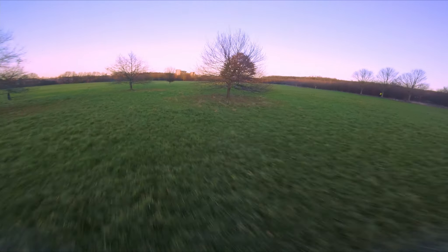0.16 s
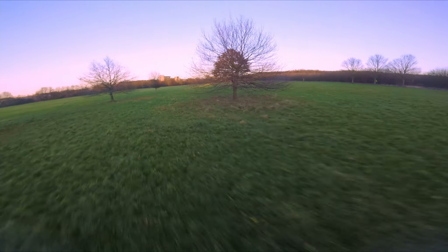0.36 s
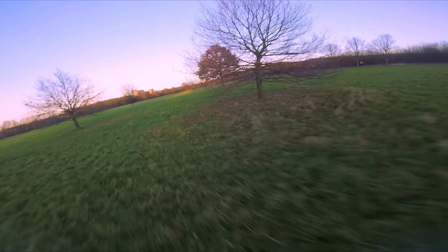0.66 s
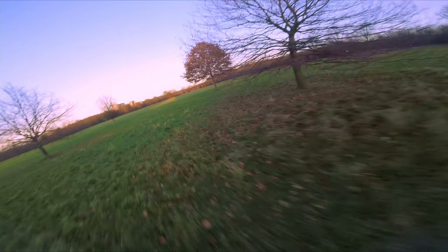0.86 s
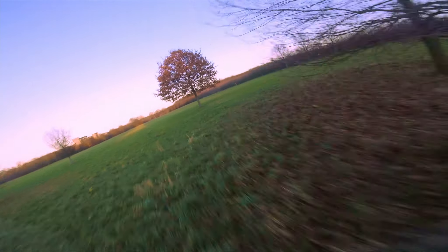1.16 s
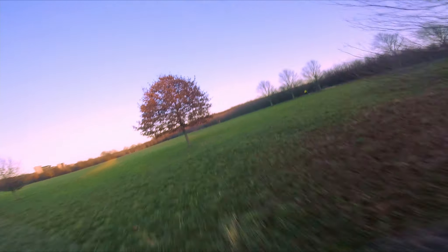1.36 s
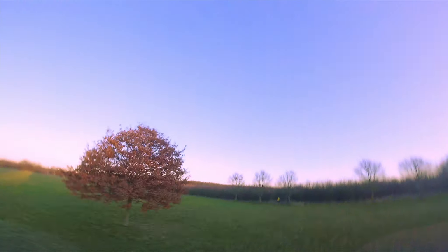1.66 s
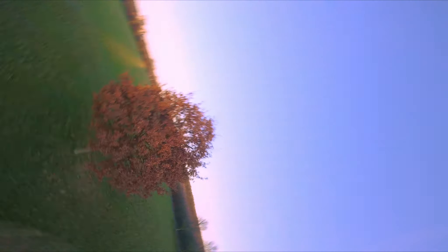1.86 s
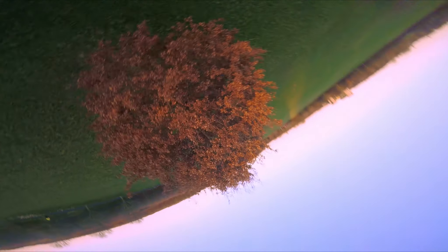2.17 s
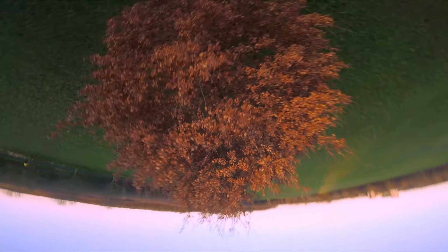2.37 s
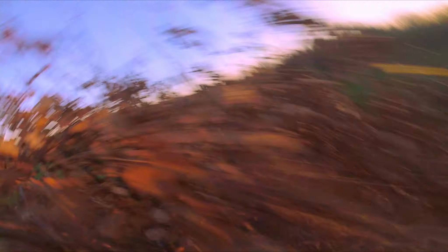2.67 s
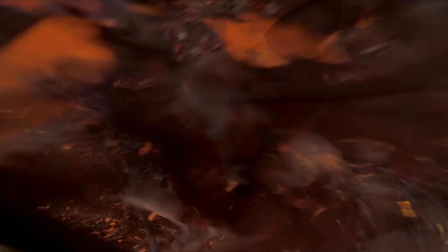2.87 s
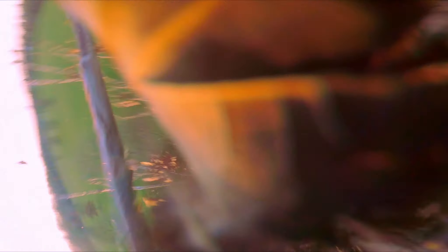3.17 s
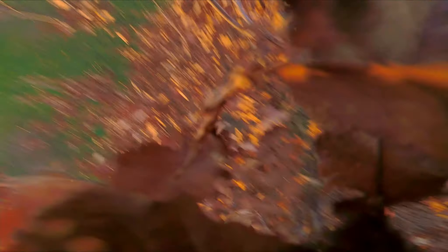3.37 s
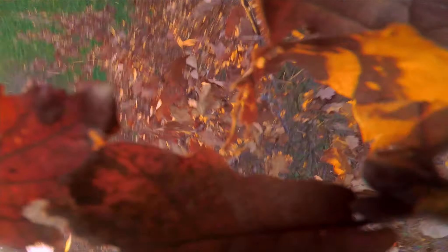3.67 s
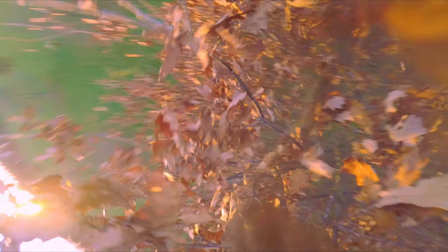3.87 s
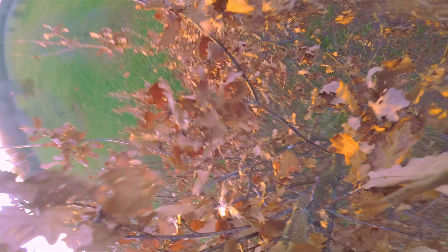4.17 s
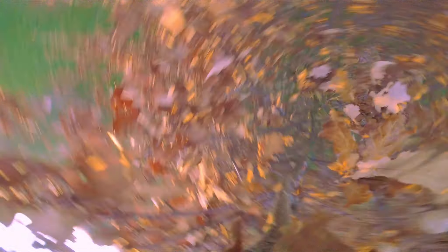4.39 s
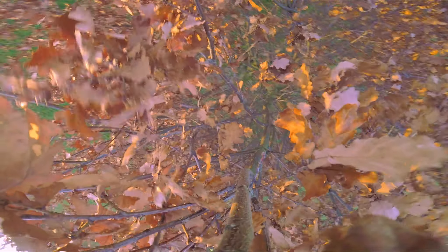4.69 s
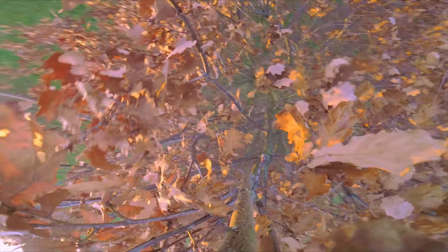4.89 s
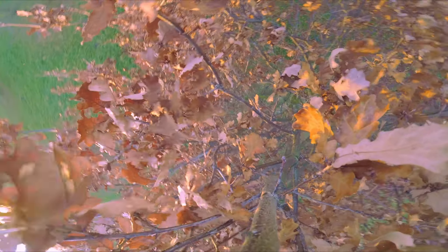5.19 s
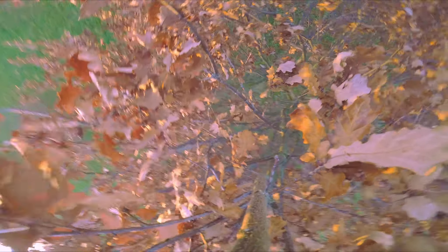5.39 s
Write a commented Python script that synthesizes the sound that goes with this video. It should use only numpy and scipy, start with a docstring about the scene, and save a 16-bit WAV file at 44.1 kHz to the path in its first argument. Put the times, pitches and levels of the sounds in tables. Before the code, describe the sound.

Drone propellers whine and rise in pitch, ease off, then chop through leaves and twigs and stop, followed by quiet dry rustling.

```python
"""Whining propellers and rushing air: a small racing quadcopter, heard from its own camera, speeds over
a meadow, idles through a roll and dives into a tree. Each three-blade propeller sings at its own speed;
in the crown the blades chop leaves, hit twigs and stall. The frame then hangs in the swaying branches,
bumping softly while dry leaves rustle against it."""
import sys
import numpy as np
from scipy import signal
from scipy.fft import rfft, irfft
from scipy.io import wavfile
from scipy.ndimage import uniform_filter1d, map_coordinates

SR = 44100
rng = np.random.default_rng(int(sys.argv[2]) if len(sys.argv) > 2 else 0)


def digitize_waveform(pressure):
    """Quantize a signal to 16-bit integers and store it at the path in sys.argv[1].

    Rows of a 2-D input are taken as channels; values are limited to [-1, 1].
    """
    field = np.atleast_2d(pressure).T
    bounded = np.clip(field, -1, 1)
    quanta = np.round(bounded * 32767).astype(np.int16)
    wavfile.write(sys.argv[1], SR, quanta)


N = 244314
TIME = np.arange(N) / SR
CRASH_S, STOP_S, STALL_S = 2.72, 3.635, .04  # the tree ends the flight; the motors cut out; stall time

# one throttle for all motors: t/s, throttle (0 = cruise, 1 = full)
THROTTLE = [(0, .2), (.32, 0.0091), (.81, 0.00077), (1.03, .33), (1.565, 1)]
# shaft speed and relative tone level by motor: cruise f/Hz, full f/Hz, cruise level/dB, full level/dB
MOTORS = {"slow": (177, 322, -16.5, -16.5), "bent": (200, 320, -19, -14), "fast": (231, 388, -23, -21.5)}
# crisp spectrum of dry leaves and twigs: f/Hz, level/dB
LEAF_COLOUR = [(400, -6.5), (900, -4), (2000, -14), (3200, -12.5), (4700, -27.5), (6400, -10.5),
               (9500, -26.5), (14000, -60.5)]


def motors():
    """The whine of four propellers; also returns three shaft angles and the fast motor's speed."""
    # a blade drumming evenly on one leaf: t/s, length/s, relative level/dB
    drums = [(2.964, .015, -16), (3.392, 0.012, -12.5)]
    (slow_hz, slow_gain), (bent_hz, bent_gain), (fast_hz, fast_gain) = map(motor, ("slow", "bent", "fast"))
    slow, bent, fast = turns(slow_hz), turns(bent_hz), turns(fast_hz)
    # the fourth motor runs between the others and hunts as it trims the attitude
    fourth_hz = slow_hz + .22 * (fast_hz - slow_hz)
    fourth = turns(fourth_hz * (1 + .013 * walk(6)))
    for s, length_s, db in drums:
        bent_gain = bent_gain + undb(db) * contact(s, length_s, attack_s=.024, release_s=.024)
    whine = undb(-1) * slow_gain * propeller(slow, second_db=-10, slope_db=28, uneven_db=-40.5)
    whine += undb(-11.5) * slow_gain * propeller(fourth, second_db=-10.5, slope_db=6.5, uneven_db=-23.5)
    whine += undb(-1.5) * bent_gain * propeller(bent, second_db=-19, slope_db=3.5, uneven_db=-16.5)
    whine += undb(3) * fast_gain * propeller(fast, second_db=-10, slope_db=11.5, uneven_db=-18)
    # the unbalanced propeller shakes the camera once a turn; the mount damps this away from cruise
    octaves = np.abs(np.log2(bent_hz / MOTORS["bent"][0]))
    shake_db = -10 - 11.5 * octaves + 2.3 * walk(40)
    shake = np.sqrt(2) * np.sin(2 * np.pi * bent) * undb(shake_db)
    return whine + shake * coasting() ** 2.4, (slow, bent, fast), fast_hz


def motor(name):
    """Shaft speed and tone gain of one motor: it follows the throttle, coasts, steers, revs and stalls."""
    # each motor near idle, steering the roll: t/s, shaft f/Hz, relative level/dB
    roll = {"slow": [(1.865, 44, -8.5), (2.17, 43.72, -12.5), (2.3, 39.77, -14), (2.6, 42.9, -13.5)],
            "bent": [(1.72, 169.8, -20.5), (1.83, 149.7, -11.5), (1.9, 109.5, -19), (2.01, 94.44, -10),
            (2.13, 69.44, -13.5), (2.36, 80, -9.5), (2.55, 110, -8)], "fast": [(1.85, 75, -53),
            (2.52, 66, -20.5)]}[name]
    # revs to right the frame in the tree: motor, peak t/s, shaft f/Hz, rise/s, fall/s, relative level/dB
    surges = [("bent", 2.67, 320, .125, .26, -17.5), ("fast", 2.695, 425, .125, .3, -27),
              ("fast", 2.85, 405, .2, .2, -31.5), ("slow", 3.095, 270, .2, .2, -31.5),
              ("slow", 3.24, 262, .07, .2, -24), ("bent", 3.415, 230, .11, 0.56, -30),
              ("fast", 3.455, 355, .16, .2, -25)]
    inertia_s, idle_hz = .016, 38.05  # rounding of a surge; least speed until the stall
    cruise_hz, full_hz, cruise_db, full_db = MOTORS[name]
    throttle, coast = curves(THROTTLE)[0], coasting()
    hz = (cruise_hz + (full_hz - cruise_hz) * throttle) * coast
    gain = undb(cruise_db + (full_db - cruise_db) * throttle) * coast ** 1.2
    roll_hz, roll_db = curves(roll)
    hz = np.maximum(hz, roll_hz * during(roll))
    gain = np.maximum(gain, undb(roll_db) * during(roll))
    for which, s, peak_hz, rise_s, fall_s, db in surges:
        if which == name:
            from_peak_s = np.hypot(TIME - s, inertia_s) - inertia_s
            surge = np.exp(-from_peak_s / np.where(TIME < s, rise_s, fall_s))
            hz = np.maximum(hz, peak_hz * surge)
            gain = np.maximum(gain, undb(db) * surge ** 3)
    running = after(STOP_S, STALL_S)
    return np.maximum(hz, idle_hz) * running, gain * running


def propeller(angle, second_db, slope_db, uneven_db, harmonics=15, bite_db=2):
    """Three blades sound every third shaft harmonic; unequal blades leave weak lines between."""
    # body of the whine: f/Hz, level/dB
    whine_colour = [(200, -4), (1900, 1), (3000, -4.5), (4400, -10), (9000, -30.5)]
    out = np.zeros(N)
    bite = undb(bite_db * curves(THROTTLE)[0] * coasting())  # throttle brings out the blade overtones
    for k in range(2, harmonics + 1):
        if k == 3:
            gain = 1
        elif k % 3 == 0:
            gain = bite * undb(second_db - slope_db * np.log2(k / 6))
        else:
            gain = undb(uneven_db - 5 * np.log2(k / 2))
        # each harmonic wavers in the turbulent inflow
        gusts = 1 + .18 * np.interp(TIME, np.arange(600) / 100, rng.standard_normal(600))
        out += gain * gusts * np.sin(2 * np.pi * (k * angle + rng.random()))
    return np.sqrt(2) * colour(out, whine_colour)


def turns(hz, jitter=1.2):
    """Shaft angle in turns; the flight controller nudges the speed and each turn differs a little."""
    # speed flutter, small under power, large at idle and among leaves: t/s, share of the speed
    flutter = [(1.62, 0.0022), (1.9, 0.02), (2.6, .018), (3.6, 0.015)]
    wobble = curves(flutter)[0] * (walk(45) + jitter * walk(600))
    return np.cumsum(hz * (1 + wobble)) / SR


def coasting(cut_s=1.595, ease_s=.04, coast_s=.125):
    """Share of their speed that the propellers keep once the throttle is eased off."""
    return np.exp((ease_s - np.hypot(np.maximum(TIME - cut_s, 0), ease_s)) / coast_s)


def chopping(angles, strength):
    """Each passing blade slaps the leaves with its own force; on a twig the slaps flare and die away."""
    # propellers hitting twigs: t/s, relative peak level/dB, decay/s
    strikes = [(2.707, -6, 0.013), (2.751, 1.5, 0.011), (2.803, -1.5, 0.01), (2.922, -25, 0.011),
               (2.944, -6, 0.012), (2.983, -8.5, 0.0028), (3.011, -22, 0.0074), (3.062, -6, 0.013),
               (3.203, -7.5, 0.0044), (3.225, -8, 0.022), (3.301, -8, 0.025), (3.624, -4.5, 0.015)]
    # thwack of a blade on leaves: f/Hz, level/dB
    chop_colour = [(40, -30), (130, 10.5), (400, 1.5), (850, 4), (1700, -13), (2500, -33), (3400, -26.5),
                   (4700, -52.5), (6500, -30.5), (9500, -51), (13000, -63)]
    passes = sum(np.diff(np.floor(3 * angle), prepend=0) for angle in angles)
    slaps = passes * undb(4 * np.clip(rng.standard_normal(N), -2, 2))
    slaps /= np.sqrt(uniform_filter1d(slaps ** 2, size=2048) + 1e-6)  # equally loud at any blade rate
    tearing = unit(grains(rate=5500, spread_db=3.5))
    chatter = unit(colour(slaps + .5 * tearing, chop_colour))
    out = chatter * strength * undb(2 * walk(70))
    for s, db, decay_s in strikes:
        add(out, s, db - 1, chatter[int(s * SR):][:SR // 8] * swell(decay_s))
    add(out, strikes[0][0], db=-1, x=burst(.0051, LEAF_COLOUR))  # the first twig snaps
    return out


def foliage():
    """Envelopes of chopping, hiss and buffeting as the propellers plough through the leaves."""
    # clumps of foliage: t/s, length/s, attack/s, release/s, chop level/dB, hiss level/dB, buffet level/dB
    thickets = [(2.624, 0.085, 0.085, 0.032, -18.5, -16.5, -8),
                (2.871, 0.071, .01, 0.021, -11.5, -28, -18.5),
                (2.995, 0.089, 0.0301, 0.044, -17.5, -51.5, -28),
                (3.211, 0.099, 0.017, 0.033, -25, -50, -39), (3.319, 0.079, 0.013, 0.025, -17, -44, -26.5),
                (3.432, 0.2, 0.042, 0.0091, -21.5, -33.5, -48)]
    power = sum((undb(dbs)[:, None] * contact(s, length_s, attack_s, release_s)) ** 2
                for s, length_s, attack_s, release_s, *dbs in thickets)
    return np.sqrt(power)


def squeal(angle, harmonics=9, release_s=.012):
    """Blade tips rubbing on a twig give a bright rasp at the blade rate."""
    # tips on twigs: t/s, length/s, attack/s, level/dB
    rubs = [(2.68, 0.022, .04, -25.5), (2.866, 0.016, 0.019, -19.5), (3.47, .13, 0.05, -50)]
    # edge of the rasp at the camera: f/Hz, level/dB
    rasp_colour = [(100, -14), (2000, 13), (3300, 5), (4600, 2.5), (6200, 15), (8000, 7.5), (10500, 6.5),
                   (12500, -44.5)]
    angle = angle + .005 * walk(900)  # no two taps are quite alike
    buzz = sum(np.sin(2 * np.pi * (3 * k * angle + rng.random())) / k ** 1.1
               for k in range(1, harmonics + 1))
    pressure = sum(undb(db) * contact(s, length_s, attack_s, release_s)
                   for s, length_s, attack_s, db in rubs)
    return unit(colour(buzz, rasp_colour)) * pressure * undb(2 * walk(250))


def air(angle, hz, leaf_hiss, leaf_buffet, cruise_hiss_db=-24, wind_db=-21):
    """Turbulence off the blades, pulsing as they pass, and wind buffeting the microphone."""
    # airy propeller wash: f/Hz, level/dB
    wash_colour = [(150, -25), (400, -7), (1200, 5), (2700, -6), (4500, -21.5), (6300, -11), (8000, -16),
                   (10500, -32), (12500, -55), (15000, -71)]
    # low wind rumble: f/Hz, level/dB
    wind_colour = [(20, -17.5), (55, -1.5), (120, -2), (200, -5), (400, -22.5), (1000, -69)]
    flying = after(CRASH_S, decay_s=.009)
    octaves = np.log2(hz / MOTORS["fast"][0])
    hiss = undb(cruise_hiss_db + 3.5 * octaves) * flying
    shredding = leaf_hiss * undb(3 * walk(220))  # the hiss flickers as leaves tear
    pulsing = 1 + .4 * np.sin(6 * np.pi * angle)
    wash = unit(colour(rng.standard_normal(N) * pulsing, wash_colour)) * np.hypot(hiss, shredding)
    wind = noise(wind_colour) * np.hypot(undb(wind_db) * flying, leaf_buffet)
    return wash + wind * undb(2 * walk(24.44))


def branches(rest_db=-55, hush_db=-49.5):
    """Swaying leaves scratch the hanging frame and crack; branches rub it and bump it dully."""
    # the frame swinging into leaves: t/s, fade/s, rustle level/dB, rumble level/dB
    swings = [(3.68, 0.034, -64, -27.5), (3.877, 0.064, -50, -39.5), (4.019, 0.082, -65, -39.5),
              (4.23, 0.033, -69.5, -40), (4.475, 0.053, -45, -31), (4.537, 0.064, -51, -34.5),
              (4.845, 0.078, -50, -36.5), (5.03, 0.079, -43, -32), (5.29, 0.18, -45.5, -34.5),
              (5.52, 0.3, -41, -33.5)]
    # the frame bumping branches: t/s, peak level/dB
    bumps = [(4.187, -30), (4.212, -28), (4.443, -22.5), (4.494, -21), (4.53, -34), (5.005, -18),
             (5.022, -28), (5.406, -15), (5.509, -17)]
    # dry leaves cracking: t/s, peak level/dB
    cracks = [(3.8305, -36), (3.8617, -27.5), (4.388, -36), (4.454, -35.5), (4.4964, -28), (4.77, -37.5),
              (4.998, -28), (5.021, -24), (5.297, -32), (5.4248, -30)]
    # dull body of the frame: f/Hz, level/dB
    frame_colour = [(25, -7.5), (100, 0.5), (230, 4), (350, -4.5), (1000, -20.5), (2000, -42.5),
                    (4000, -84.5)]
    # faint, steady hush between the movements: f/Hz, level/dB
    hush_colour = [(150, 11), (450, -24), (2200, -24), (3300, -16.5), (4800, -36), (6700, -19.5),
                   (11000, -48)]
    hanging = 1 - after(STOP_S, STALL_S)
    power = sum((undb(dbs)[:, None] * contact(s, 0, attack_s=.94 * fade_s, release_s=fade_s)) ** 2
                for s, fade_s, *dbs in swings)
    scratch, rub = np.sqrt(power)
    rustle = dry_leaves() * scratch * undb(walk(50))
    rumble = noise(frame_colour) * np.hypot(rub, undb(rest_db))
    hush = noise(hush_colour) * undb(hush_db)
    out = (rustle + rumble + hush) * hanging
    for s, db in bumps:
        add(out, s, db, burst(.015, frame_colour))
    for s, db in cracks:
        add(out, s, db, burst(.0047, LEAF_COLOUR))
    return out


def dry_leaves(count=7):
    """Each leaf crackles in its own band and comes and goes on its own."""
    out = np.zeros(N)
    for hz in np.geomspace(800, 9000, count):
        band = signal.butter(1, [hz * .75, hz / .75], "bandpass", fs=SR, output="sos")
        out += signal.sosfilt(band, grains(rate=800, spread_db=2.2)) * undb(5 * walk(35))
    return unit(colour(out, LEAF_COLOUR))


def idle_whistle():
    """The idling motors give a thin, high whistle."""
    # swell of the whistle: t/s, level/dB
    levels = [(1.82, -77), (2.1, -42), (2.55, -54)]
    return wavering(levels, hz=7040, rate=190)


def lingering_hum():
    """A low hum lingers as the motors stop."""
    # fade of the hum: t/s, level/dB
    levels = [(3.64, -39), (4.4, -63.5)]
    return wavering(levels, hz=257, rate=45)


def undb(db):
    """Decibels to gain."""
    return 10 ** (np.asarray(db) / 20)


def unit(x):
    """Scale to rms 1."""
    return x / np.sqrt(np.mean(x ** 2) + 1e-18)


def curves(table):
    """The columns of a table, joined by straight lines in time."""
    s, *columns = np.transpose(table)
    return [np.interp(TIME, s, c) for c in columns]


def during(table, fade_s=.022):
    """1 while a table lasts, with short fades outside it."""
    return np.clip(1 + np.minimum(TIME - table[0][0], table[-1][0] - TIME) / fade_s, 0, 1)


def after(s, decay_s):
    """1 until time s, then dying away."""
    return np.exp(-np.maximum(TIME - s, 0) / decay_s)


def contact(s, length_s, attack_s, release_s):
    """Envelope that swells up to time s, holds and dies away."""
    return np.exp(np.minimum(TIME - s, 0) / attack_s) * after(s + length_s, release_s)


def swell(decay_s):
    """Envelope of a yielding contact: a quick rise, then a decay."""
    t = TIME[:SR // 8]
    return np.tanh(t / .002) ** 2 * np.exp(-t / decay_s)


def walk(rate):
    """Smooth random drift of rms 1 that changes `rate` times a second."""
    steps = rng.standard_normal(N // 10)
    return unit(map_coordinates(steps, [TIME * rate], order=3, mode="wrap"))


def colour(x, points, size=4096):
    """Minimum-phase EQ through points of f/Hz, level/dB."""
    hz, db = np.transpose(points)
    grid = np.maximum(np.arange(size // 2 + 1) * SR / size, 1)
    gains = undb(np.interp(np.log(grid), np.log(hz), db))
    cepstrum = irfft(np.log(gains))
    cepstrum[1:size // 2] *= 2
    cepstrum[size // 2 + 1:] = 0
    impulse = irfft(np.exp(rfft(cepstrum)), size)
    return signal.fftconvolve(x, impulse)[:len(x)]


def noise(points):
    """Steady coloured noise of rms 1."""
    return unit(colour(rng.standard_normal(N), points))


def burst(decay_s, points):
    """A dying scrape of coloured noise."""
    return colour(rng.standard_normal(SR // 8) * swell(decay_s), points)


def grains(rate, spread_db):
    """Random clicks, mostly small and a few large."""
    sizes = undb(spread_db * np.minimum(rng.exponential(size=N), 4))
    return (rng.random(N) < rate / SR) * rng.standard_normal(N) * sizes


def wavering(levels, hz, rate):
    """A tone that flutters in strength and follows a level curve."""
    tone = unit(walk(rate) * np.sin(2 * np.pi * hz * TIME))
    return tone * undb(curves(levels)[0]) * during(levels)


def add(out, s, db, x):
    """Mix in a sound at time s with the given peak level."""
    i = int(s * SR)
    out[i:i + len(x)] += (undb(db) * x / np.abs(x).max())[:N - i]


def scene():
    """Flight and tree both reach the one microphone on the frame."""
    whine, (slow, bent, fast), fast_hz = motors()
    chop, leaf_hiss, leaf_buffet = foliage()
    flight = whine + air(fast, fast_hz, leaf_hiss, leaf_buffet) + idle_whistle()
    tree = squeal(fast) + chopping((slow, bent, fast), chop) + lingering_hum() + branches()
    return (flight + tree)[None]


def record(dry):
    """The camera rounds off the highest peaks and cuts the top."""
    top_hz = 15100
    rounded = dry / (1 + dry ** 6) ** (1 / 6)
    return signal.sosfilt(signal.ellip(8, .2, 70, top_hz, fs=SR, output="sos"), rounded)


dry = scene()
out = record(dry)
digitize_waveform(out)
```